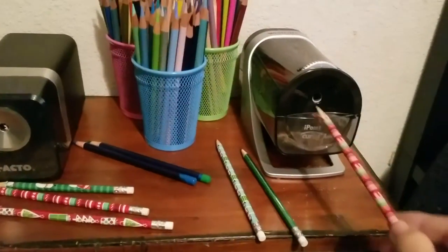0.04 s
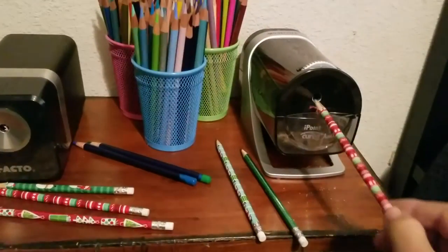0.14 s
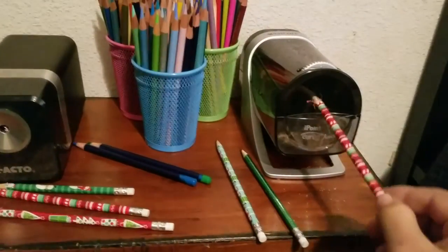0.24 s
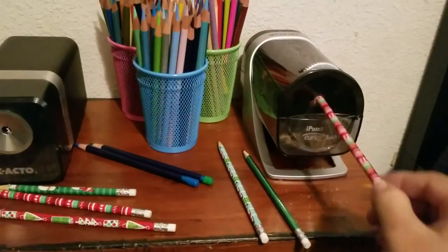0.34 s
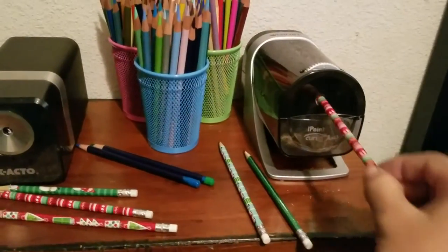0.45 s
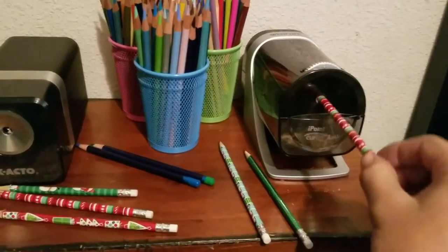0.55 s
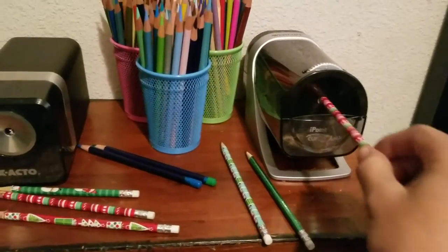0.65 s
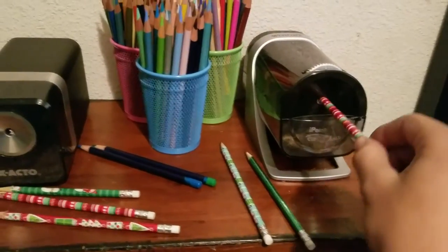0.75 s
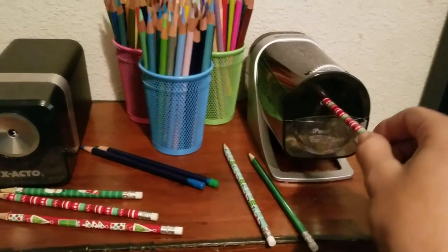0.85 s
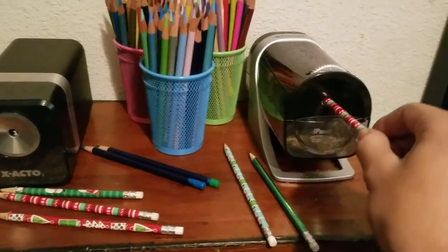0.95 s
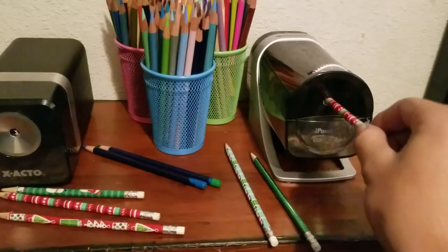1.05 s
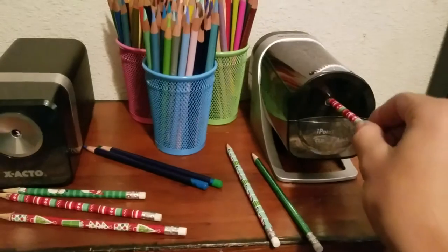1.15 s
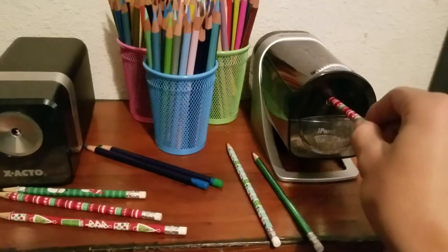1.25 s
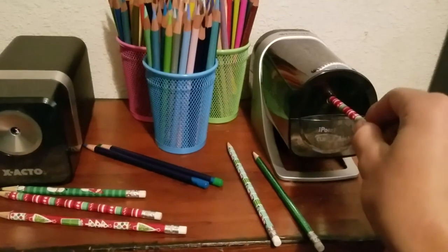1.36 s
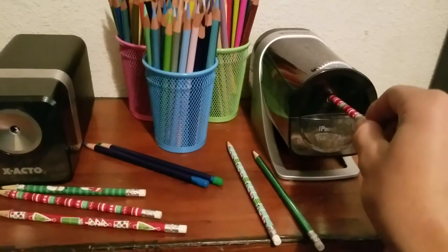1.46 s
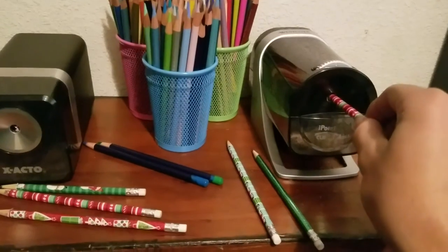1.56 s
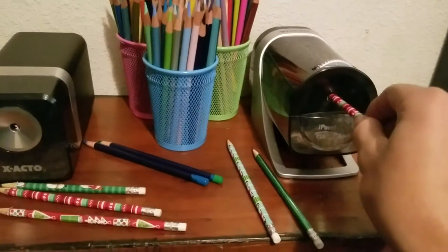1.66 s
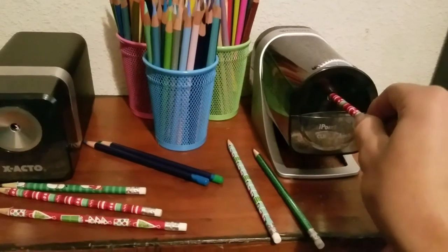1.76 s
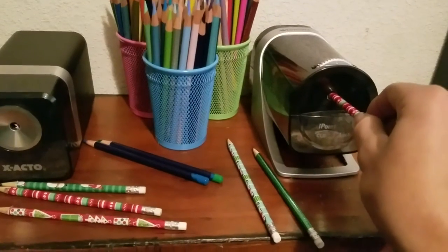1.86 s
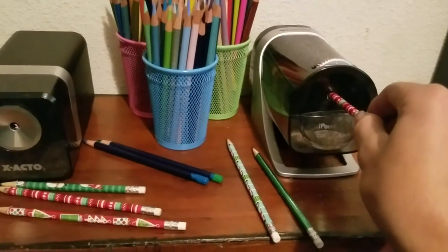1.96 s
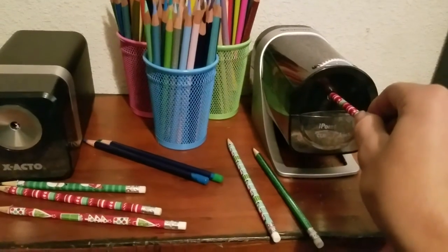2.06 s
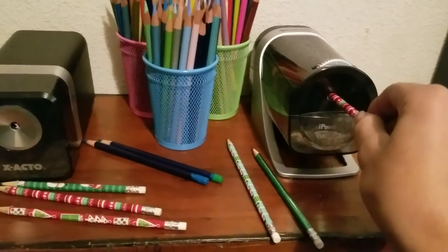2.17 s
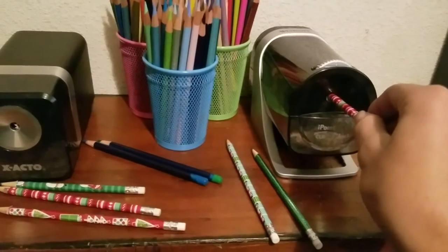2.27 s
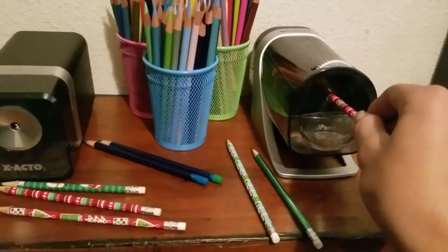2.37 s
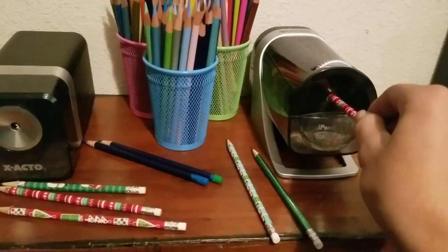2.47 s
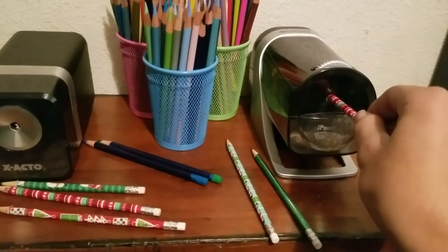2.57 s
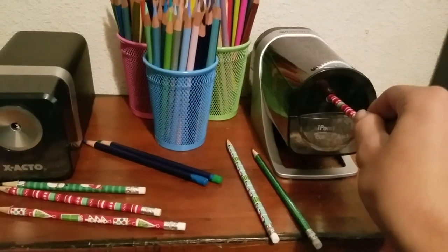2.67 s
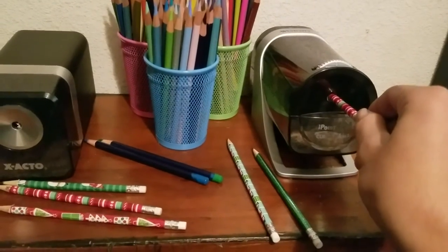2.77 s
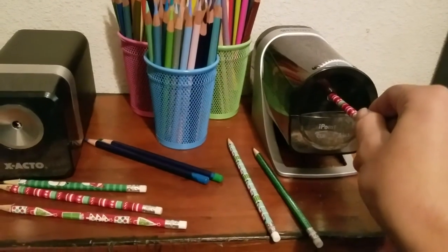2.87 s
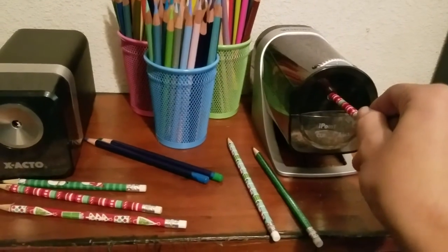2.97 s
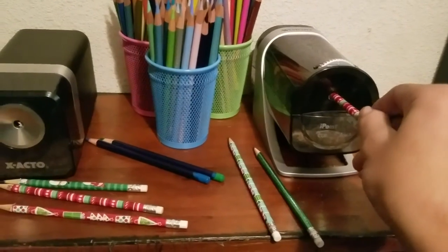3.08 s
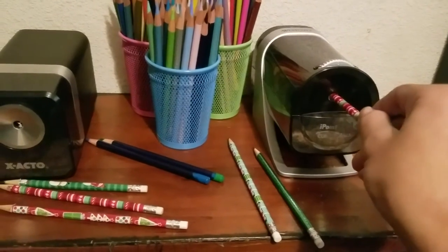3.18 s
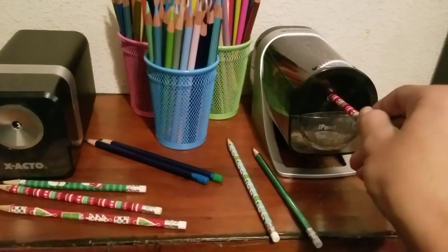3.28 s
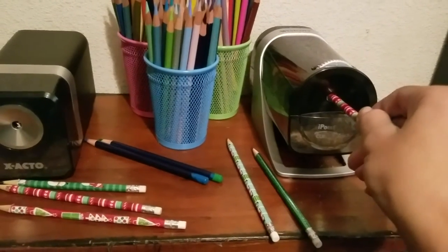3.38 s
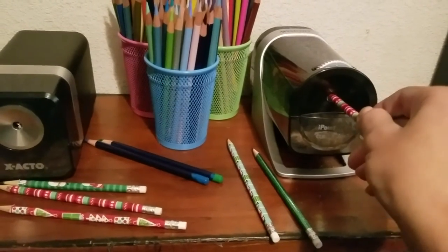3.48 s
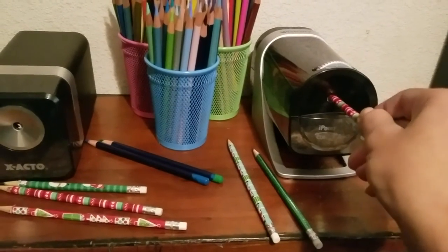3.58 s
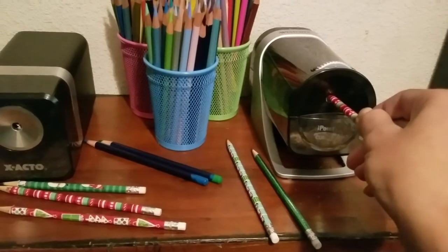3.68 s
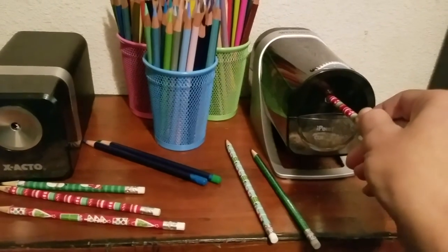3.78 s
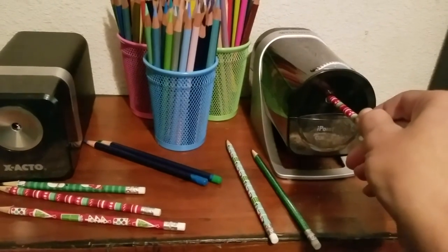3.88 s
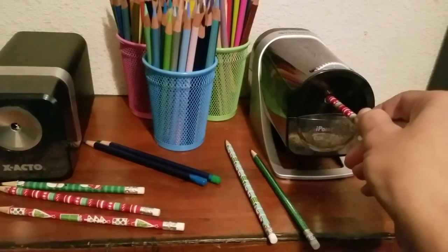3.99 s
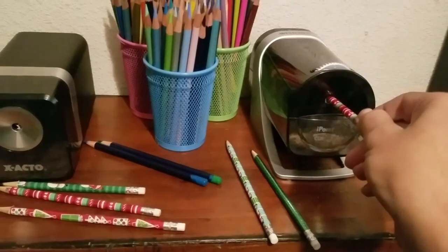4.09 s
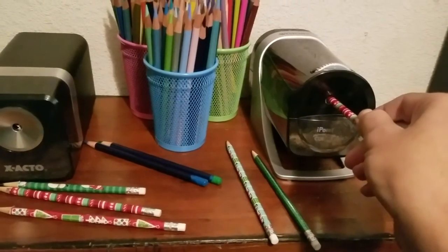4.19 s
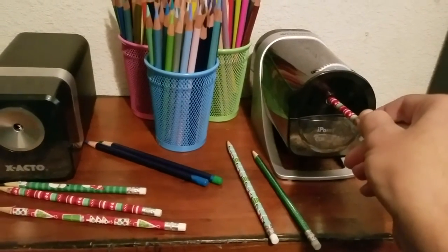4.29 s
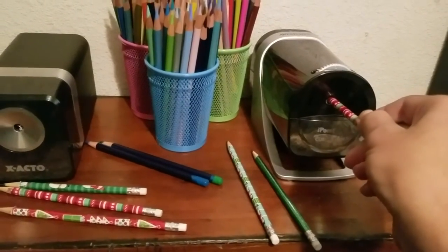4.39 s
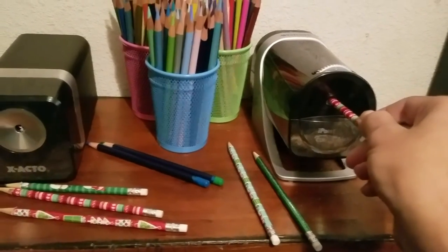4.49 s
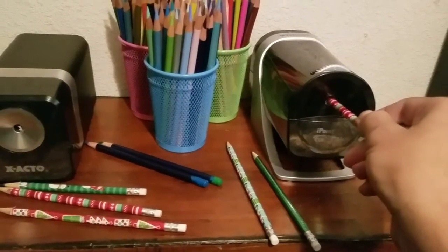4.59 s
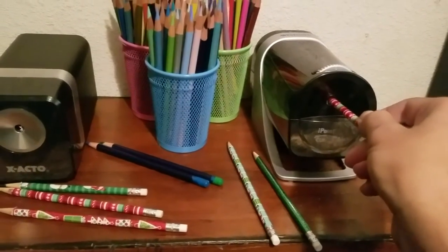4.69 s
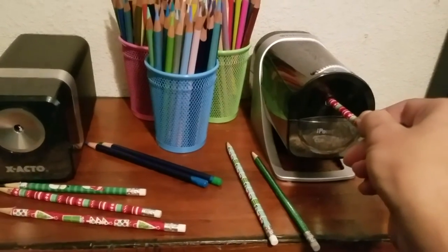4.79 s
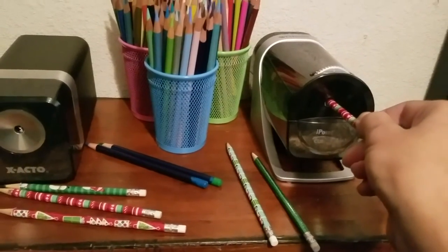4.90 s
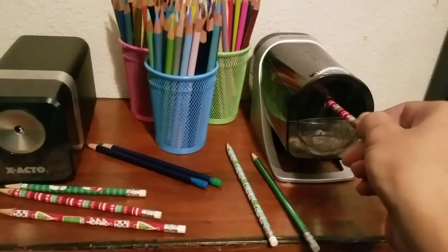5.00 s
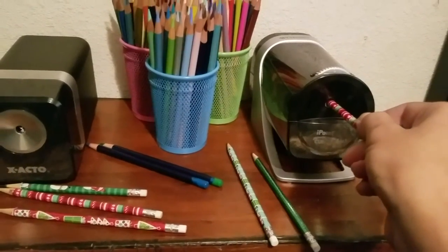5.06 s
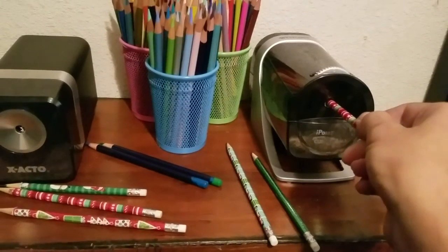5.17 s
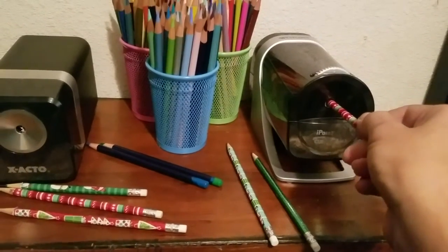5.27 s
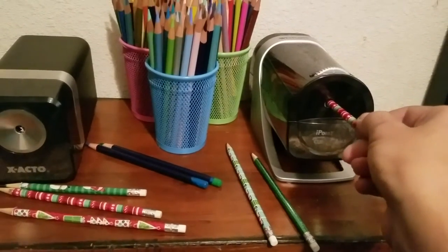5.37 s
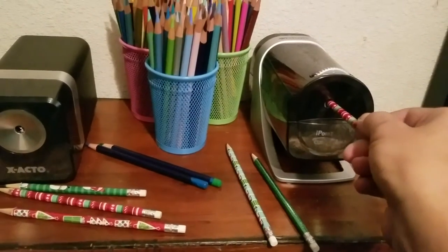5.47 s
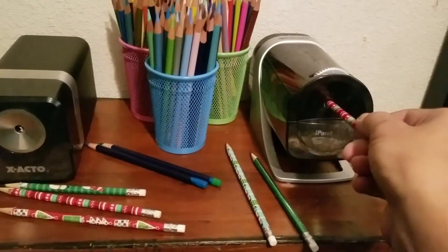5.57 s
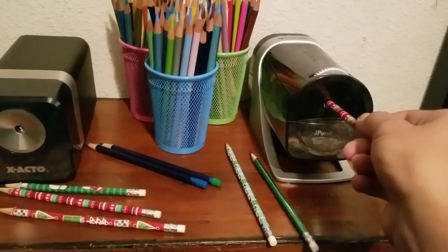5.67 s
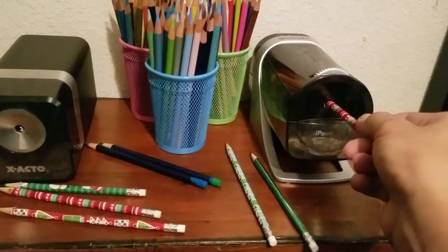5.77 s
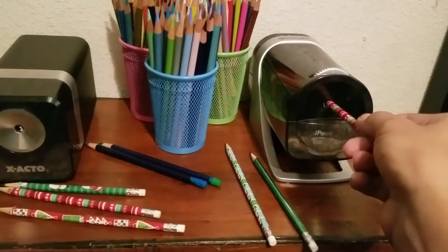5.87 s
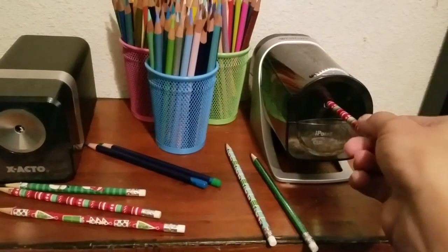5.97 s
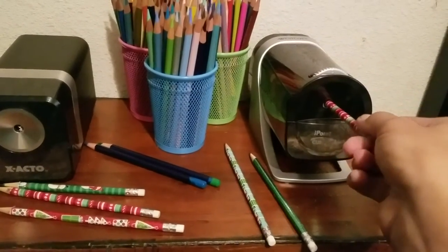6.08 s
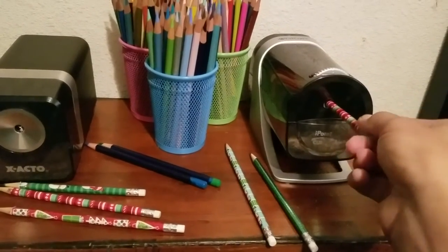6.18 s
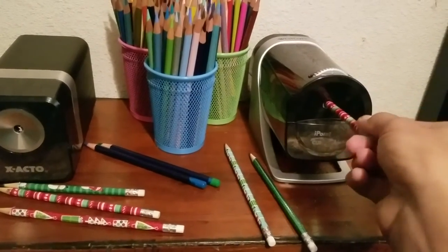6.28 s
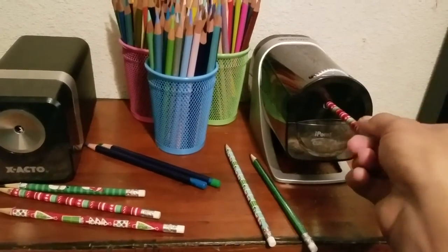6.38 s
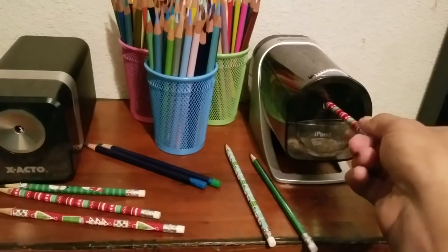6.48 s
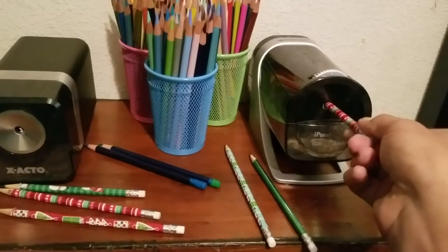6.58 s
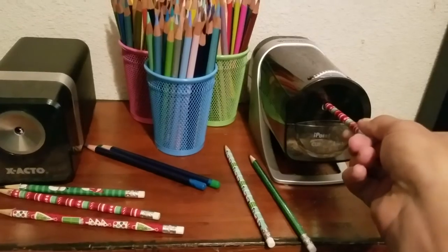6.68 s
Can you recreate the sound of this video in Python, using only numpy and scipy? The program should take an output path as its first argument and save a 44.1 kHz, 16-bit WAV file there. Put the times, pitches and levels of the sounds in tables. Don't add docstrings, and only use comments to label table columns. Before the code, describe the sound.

Close up in a small, quiet room, a pencil slides and knocks in the hollow plastic mouth of an electric sharpener. A switch clicks and the motor kicks in, whirring free for about half a second. Then wood meets the cutter: the whirr deepens into a loud, rough grind with gear whine, plastic rattle, low chatter and hissing shavings, continuing to the end.

```python
import sys
import numpy as np
from scipy import signal
from scipy.fft import rfft, irfft, next_fast_len
from scipy.io import wavfile
from scipy.ndimage import uniform_filter1d, map_coordinates

SR = 44100
rng = np.random.default_rng(int(sys.argv[2]) if len(sys.argv) > 2 else 0)


def nominal_scale(level):
    x = np.asarray(level, float) / 20
    return 10 ** x


def digitize_waveform(pressure):
    field = np.atleast_2d(pressure).T
    bounded = np.clip(field, -1, 1)
    quanta = np.round(bounded * 32767).astype(np.int16)
    wavfile.write(sys.argv[1], SR, quanta)


N = 297262
T = np.arange(N) / SR

# (frequency [Hz], level [dB per Hz])
QUIET_COLOUR = [(24, -9), (60, 4), (120, -5), (249, -3.5), (305, -8), (503, -4.5), (556, -11), (1210, -11),
                (1340, -17), (1900, -7.5), (3470, -26), (5500, -24), (9220, -30), (16000, -26)]
# (frequency [Hz], time to fall 60 dB [s])
ROOM_DECAY = [(200, 0.07), (2000, 0.75), (10000, 0.023)]
# (frequency [Hz], likeness [0-1])
ALIKENESS = [(60, 1), (100, 0.9), (180, 0.96), (310, 0.99), (550, 0.99), (950, 0.92), (1650, 0.66),
             (2860, 0.72), (4970, 1), (8640, 0.18), (15000, 0.31)]
# (frequency [Hz], level difference [dB])
LEFT_OVER_RIGHT = [(60, 0.5), (92, 0.5), (140, 0.5), (210, 1.0), (330, -1.0), (500, -3.0), (770, -0.5),
                   (1170, -0.5), (1790, 2.0), (2740, 1.5), (4190, 0.5), (6410, -0.5), (9810, 8.0),
                   (15000, 8.0)]
# (frequency [Hz], lead [radians])
LEFT_LEAD = [(0, 0), (1380, 0.2), (2410, -1.4), (2670, 0.2), (3620, -2.3), (3880, -1.7), (6200, -1.6),
             (7150, -4.0), (7410, -1.7), (11900, -8.5), (13000, -8.3), (16200, -10.7)]

# (loudest at [s], level [dB])
PENCIL_SLIDES = [
    (.15, -72),
    (.255, -61),
    (.38, -50),
    (.46, -69),
    (.655, -58),
]
# (time [s], peak [dB], ring [Hz], tick [dB])
PENCIL_KNOCKS = [
    (0.16, -53, 1210, -14),
    (0.232, -40, 1020, -20),
    (0.246, -40.5, 1060, -19),
    (0.375, -32.5, 2060, -25),
    (0.389, -43, 1260, -14),
    (0.404, -47, 1200, -14),
    (0.445, -35.5, 2760, -5),
    (0.509, -46, 1230, -13),
    (0.681, -34, 1190, 10.5),
    (0.716, -22, 980, -20),
]
# (frequency [Hz], level [dB per Hz])
MOUTH_COLOUR = [(240, -59), (400, -17), (996, 4.5), (1630, -3), (2150, 0), (2940, -21), (3620, -12),
                (4170, -24), (4820, -25), (9000, -28), (11700, -72), (19800, -120)]

# (time [s], load [0-1])
CUTTER_LOAD = [
    (0, 0.4),
    (1.2, 0.04),
    (1.27, 1),
    (6.74, 0.99),
]
# (time [s], level [dB])
HAND_PUSH = [(1.2, -1), (1.5, -6), (2, -1), (3, 0.5), (4, -0.5), (5, -0.5), (6, -0.8), (6.74, -4)]
# (time [s], lead [turns])
CUTTER_LEAD = [(.68, .21), (1.3, .22), (2, .22), (3, .21), (4, .18), (5, .13), (6, .05), (6.74, -.03)]
# (time [s], lead [cycles])
ROTOR_LEAD = [(.68, -10.7), (.84, -9.3), (1.25, -2.1), (1.32, -1.45), (1.5, -.58), (1.7, -.12), (2.1, .3),
              (2.9, .7), (3.8, 2.2), (4.3, 2.05), (4.7, 2.44), (5.9, 1.04), (6.74, .85)]

# (frequency [Hz], width [Hz], level [dB])
FREE_RESONANCES = [(1060, 31, 2.5), (1300, 30, 2), (1676, 120, 0.5), (2180, 25, 7.5), (2460, 150, -6.5),
                   (3100, 104, -8), (3950, 70, -10.5), (4630, 200, -22), (5480, 140, -23), (6230, 230, -16),
                   (7200, 110, -24), (7460, 120, -28), (7800, 120, -48), (8050, 53, -24)]
# (frequency [Hz], width [Hz], level [dB])
CUT_RESONANCES = [(801, 29, -6), (1200, 110, -4.5), (1410, 56, -16.5), (1690, 20, -9), (2260, 250, -9),
                  (2650, 46, -26)]
# (frequency [Hz], width [Hz], level [dB])
UPPER_RESONANCES = [(3800, 32, -3), (4700, 98, -5), (5530, 71, 0), (6380, 380, 5.5), (7840, 100, 2),
                    (7250, 110, 4), (8360, 110, -4)]
# (frequency [Hz], level [dB per Hz])
BODY_COLOUR = [(24, -77), (40, -70), (133, -18), (234, -23), (307, -20.5), (593, -21), (796, -10),
               (1170, -4), (1440, -7.5), (2310, -9.5), (2650, -15.5), (3890, -17.5), (4500, -25.5),
               (4950, -31.5), (5400, -27.5), (6260, -26), (9000, -37), (11700, -61), (19800, -120)]
# (frequency [Hz], level [dB])
IDLE_TONES = [(1023, -34.5), (1163, -38), (1256, -33), (1360, -34), (1464, -37), (1520, -45), (1600, -34.5),
              (1678, -33.5), (2505, -42), (2650, -49), (3200, -44), (2170, -39)]

# (time [s], rate [Hz])
MESH_RATE = [(1.2, 1290), (1.27, 1262), (1.36, 1255), (1.41, 1200), (1.6, 1160), (4, 1155), (6.74, 1146)]
# (multiple of the mesh rate, offset [Hz], level [dB], swell each turn [dB], top at [turns],
# swell each shaft turn [dB], top at [shaft turns])
GEAR_TONES = [(1, 0, -4.5, 2.2, .2, 6, .6), (1, -118, -6.5, 4.5, .97, 2, .1),
              (1, 122, -6, 4.5, .98, .6, .1), (2, 0, -8, 3, .15, 4, .4), (2, -225, -15, 5, .52, 3, .6),
              (2, -330, -17.5, 5, .4, 5, .6), (2, 140, -16, 5, .9, 3, .6), (2, 260, -22, 6, .95, 1.5, .6),
              (0, 2150, -13.5, 3, .8, 4.5, .75), (0, 1690, -16, 3, .8, 3, .6), (3, 0, -25, 3, .7, 3, .4)]
# (frequency [Hz], width [Hz], lift [dB])
GEAR_LIFTS = [(1056, 26, 4), (1158, 30, 5.5), (1296, 24, 4.5), (2300, 30, 4), (2380, 30, 4)]
# (frequency [Hz], level [dB], swell each turn [dB], top at [turns])
FLUTE_TONES = [(153, -2.5, 4.5, .78), (302, -2, 2.5, .9), (348, -10, 2.5, .25), (455, -4.5, 4, .58),
               (80, -20, 1.5, .3)]

# (frequency [Hz], level [dB per Hz])
FREE_HISS = [(5120, -30), (8700, 4), (10100, -13), (13300, -7), (13700, -17), (16000, -21)]
# (frequency [Hz], level [dB per Hz])
BLUNT_HISS = [(5120, -25), (8700, -7), (9830, -11.5), (10800, -1), (11500, 0), (12500, -6), (13900, -10),
              (15100, 3.5), (16000, -5)]
# (frequency [Hz], level [dB per Hz])
CONE_HISS = [(4710, -31), (8000, 4.5), (8650, -27), (9860, -3), (10300, -4), (10650, 6), (11100, 0.5),
             (12200, 1), (13200, 2.5), (14000, -5), (15100, 3), (16000, -3)]
# (frequency [Hz], level [dB per Hz])
SCRAPE_COLOUR = [(5000, -18), (9000, -10), (10100, -10), (10700, 3), (11600, -3), (13800, -8), (15000, 7),
                 (16000, 1)]
# (time [s], level over the hiss [dB])
POINT_SCRAPES = [(1.27, 0), (1.41, -12), (1.83, -1), (4.06, -2), (4.22, -3), (4.38, -5), (4.58, -7),
                 (4.75, -1), (4.93, 1), (5.08, 0), (5.24, 3), (5.39, -7), (5.6, 4), (5.76, 4), (5.93, 2),
                 (6.09, 3), (6.24, 1), (6.39, 3), (6.53, 1), (6.6, 3), (6.69, -3)]

TURN_HZ, MAINS_HZ = 6, 120
SHAFT = 5
START_S = 0.68


def unit(x):
    return x / np.sqrt(np.mean(x ** 2) + 1e-20)


def along(points, hz):
    f, v = np.transpose(points)
    return np.interp(np.log(hz + 1), np.log(f + 1), v)


def over_time(points):
    return np.interp(T, *np.transpose(points))


def ramp(t0, t1):
    return np.clip((T - t0) / (t1 - t0), 0, 1)


def wobble(rate, size=N):
    coarse = T[:size + 64:64]
    knots = rng.standard_normal(int(N * rate / SR) + 4)
    return np.interp(T[:size], coarse, map_coordinates(knots, [coarse * rate]))


def bumps(events, length_s):
    coarse = T[::64]
    bells = sum(nominal_scale(db) * np.exp(-((coarse - s) / length_s) ** 2) for s, db in events)
    return np.interp(T, coarse, bells)


def swell(turns, db, top):
    return nominal_scale(db * np.cos(2 * np.pi * (turns - top)))


def tone_phase(hz):
    return 2 * np.pi * np.cumsum(hz) / SR


def grit(spread_db):
    return unit(rng.standard_normal(N) * nominal_scale(spread_db * np.minimum(rng.standard_exponential(N), 5.5)))


def filtered(x, response):
    m = next_fast_len(N + SR // 8)
    return irfft(rfft(x, m) * response(np.fft.rfftfreq(m, 1 / SR)), m)[..., :N]


def coloured(x, points):
    return filtered(x, lambda f: nominal_scale(along(points, f)))


def modes(peaks):
    def response(f):
        total = 0
        for k, (c, width, db) in enumerate(peaks):
            total = total + (-1) ** k * nominal_scale(db) * 1j * f * width / (c * c - f * f + 1j * f * width)
        return total
    return response


def quiet_room():
    a, b = coloured(rng.standard_normal((2, N)), QUIET_COLOUR)
    return nominal_scale(-64.5) * unit(np.array([a + 0.55 * b, a - 0.6 * b]))


def pencil():
    ticks, puffs = np.zeros(N + SR), np.zeros(N + SR)
    t = np.arange(SR // 5) / SR
    for s, db, hz, tick_db in PENCIL_KNOCKS:
        tick_hz = 4180 if s < START_S else 6000
        tick, puff = rng.standard_normal((2, len(t)))
        ring = nominal_scale(-0.5 - 60 * t / 0.023) * np.sin(2 * np.pi * hz * t)
        click = np.diff(tick, prepend=0) + 2.9 * np.sin(2 * np.pi * tick_hz * t)
        click = nominal_scale(tick_db - 13 - 60 * t / 0.012) * click
        start = round(s * SR)
        ticks[start:][:len(t)] += nominal_scale(db) * (ring + click)
        puffs[start:][:len(t)] += nominal_scale(db - 2 - 60 * t / 0.06) * puff
    rise, fall = 480, 210
    slide = sum(nominal_scale(db - np.where(T < s, rise, fall) * abs(T - s)) for s, db in PENCIL_SLIDES)
    puffs = puffs[:N] + slide * nominal_scale(11.0) * (T < 0.69) * grit(spread_db=4)
    ticks = signal.sosfilt(signal.butter(2, 500, 'high', fs=SR, output='sos'), ticks[:N])
    return ticks + coloured(puffs, MOUTH_COLOUR)


def hand():
    rumble = unit(filtered(rng.standard_normal(N), modes([(141, 30, 0)])))
    return nominal_scale(-69) * np.exp(-((T - 0.44) / 0.14) ** 2) * rumble


def hum(load, push_db):
    free_db, cut_db = -43.6, -50
    lead = uniform_filter1d(over_time(ROTOR_LEAD), size=2000)
    rotor_db = free_db + (cut_db - free_db) * load - 3 * (1 - ramp(START_S, 0.73)) + 1.5 * wobble(9)
    rotor = nominal_scale(rotor_db) * np.cos(2 * np.pi * (115.5 * T + lead))
    mains_db = -47.6 + 0.33 * push_db - 3.5 * (1 - load)
    mains = nominal_scale(mains_db) * np.cos(2 * np.pi * (119.925 * T - 0.11))
    return ramp(START_S, START_S + 0.02) * (rotor + mains)


def idle():
    n = int(1.3 * SR)
    tones = 0
    for hz, db in IDLE_TONES:
        gain = nominal_scale(db + 2.5 * wobble(20, size=n))
        tones = tones + gain * np.sin(tone_phase(hz + 6 * wobble(40, size=n)))
    return np.pad(unit(tones), (0, N - n))


def free_rattle(teeth):
    rattle = unit(filtered(grit(spread_db=2.5) * teeth, modes(FREE_RESONANCES)))
    return nominal_scale(-3.0) * rattle + nominal_scale(-5.5) * idle()


def body_rattle(teeth, load, turn):
    jolt_db = 2 * np.exp(-((turn % 1 - 0.713) / 0.078) ** 2)
    broad = unit(coloured(grit(spread_db=2.5) * teeth, BODY_COLOUR))
    broad = nominal_scale(load * jolt_db - 4.5) * swell(turn, 0.5 * load, 0.97) * broad
    low = filtered(broad, lambda f: 1 / (1 + (f / 650) ** 4))
    low_db = -6 * (1 - load) + load * (1.16 * wobble(13) - 1.5)
    return broad + low * (nominal_scale(low_db) * swell(turn, 2.6 * load, 0.52) - 1)


def cutting_rattle(teeth, turn):
    ring = unit(filtered(grit(spread_db=1.0) * teeth, modes(CUT_RESONANCES)))
    upper = unit(filtered(grit(spread_db=4) * teeth, modes(UPPER_RESONANCES)))
    return nominal_scale(-10) * swell(turn, 4.26, 0.72) * ring + nominal_scale(-26) * swell(turn, 2.5, 0.9) * upper


def whine(turn):
    bite_hz = 33 * np.cos(2 * np.pi * (turn - 0.04)) + 5 * wobble(12)
    mesh_hz = over_time(MESH_RATE) + bite_hz * ramp(1.35, 1.35 + 0.1534)
    out = 0
    for multiple, offset_hz, db, turn_db, top, shaft_db, shaft_top in GEAR_TONES:
        hz = multiple * mesh_hz + offset_hz + (4 if multiple else 11) * wobble(60)
        lift_db = -4
        for c, width, top_db in GEAR_LIFTS:
            if abs(c - hz.mean()) < 200:
                lift_db = lift_db + top_db * np.exp(-((hz - c) / width) ** 2)
        gain = swell(turn, turn_db, top) * swell(SHAFT * turn, shaft_db, shaft_top)
        if multiple == 1 and offset_hz > 0:
            gain = gain * swell(turn / 2, 3, 0.52)
        level_db = db + lift_db + 1.1 * wobble(5) + 2 * wobble(45)
        out = out + nominal_scale(level_db) * gain * np.sin(tone_phase(hz))
    return out


def chatter(turn):
    out = 0
    for hz, db, turn_db, top in FLUTE_TONES:
        phase = tone_phase(hz * (1 + 0.025 * wobble(30)))
        gain = swell(turn, turn_db, top) * swell(2 * turn, 2.8, 2 * top)
        out = out + nominal_scale(db + 1.5 * wobble(9) + 2.2 * wobble(30)) * gain * np.sin(phase)
    return out


def shaving(load, turn):
    worn, cone = ramp(3.8, 5.5), ramp(2.5, 2.9)
    bite_db = 2 * (1 - 0.5 * worn) * np.cos(4 * np.pi * (turn - 0.1))
    fibres = grit(spread_db=4.0) * nominal_scale(0.65 * wobble(30) + 0.49 * wobble(150))
    colours = (FREE_HISS, BLUNT_HISS, CONE_HISS, SCRAPE_COLOUR)
    free, blunt, even, bright = [unit(coloured(fibres, c)) for c in colours]
    bites = nominal_scale(bite_db - 3 * worn) * ((1 - cone) * blunt + cone * even)
    scrapes = bumps(POINT_SCRAPES, length_s=0.019) * bright
    return nominal_scale(-69) * free + nominal_scale(-41.5) * load * (bites + scrapes)


def machine():
    push_db = over_time(HAND_PUSH)
    load = np.clip(over_time(CUTTER_LOAD), 0, 1)
    turn = TURN_HZ * T + over_time(CUTTER_LEAD)
    teeth = swell(SHAFT * turn, 0.12, 0.49) * swell(MAINS_HZ * T, 0.64, 0.094) * nominal_scale(0.81 * wobble(60))
    free = free_rattle(teeth)
    cutting = cutting_rattle(teeth, turn) + whine(turn)
    broad = body_rattle(teeth, load, turn)

    free_db, cut_db = -19.5, -18
    first_bite_db = 0.56 * np.exp(-((T - 1.52) / 0.44) ** 2)
    spin_up_db = -11 * (1 - ramp(START_S, START_S + 0.05))
    case_db = free_db + (cut_db - free_db) * load + first_bite_db + 0.033 * push_db + spin_up_db
    case = (1 - load) * free + load * cutting + (0.68 + 0.24 * load) * broad
    case = swell(turn / 2, 0.26 * load, 0.57) * nominal_scale(case_db) * case

    free_db, cut_db = -58, -43.5
    flutes = nominal_scale(free_db + (cut_db - free_db + push_db) * load) * chatter(turn)
    return (T > START_S) * (case + flutes + hum(load, push_db) + shaving(load, turn))


def placed(x):
    z = signal.stft(x, nperseg=256)[2]
    drift = np.cumsum(1.2 * rng.standard_normal(z.shape), axis=1)
    scattered = signal.istft(z * np.exp(1j * drift), nperseg=256)[1][:N]
    scattered = unit(scattered) * np.std(x)

    def spread(f):
        angle = np.arccos(np.clip(along(ALIKENESS, f), 0, 1)) / 2
        return np.array([np.cos(angle), np.sin(angle)])

    def sides(f):
        half = nominal_scale(along(LEFT_OVER_RIGHT, f) / 2) * np.exp(0.5j * along(LEFT_LEAD, f))
        return np.array([half, 1 / half])

    mid, side = filtered(np.array([x, scattered]), spread)
    return filtered(np.array([mid + side, mid - side]), sides)


def tail(seconds):
    noise = rng.standard_normal((2, int(seconds * SR)))
    hz, t, z = signal.stft(noise, SR, nperseg=256)
    h = signal.istft(z * nominal_scale(-60 * t / along(ROOM_DECAY, hz)[:, None]), SR, nperseg=256)[1]
    return h / np.linalg.norm(h[0])


def scene():
    quiet = quiet_room()
    near = placed(pencil() + hand() + machine())
    delayed = np.pad(near, ((0, 0), (300, 0)))
    room = signal.fftconvolve(delayed, tail(0.4), axes=1)[:, :N]
    return near + nominal_scale(-19) * room + quiet


def band_limit(x):
    return signal.sosfilt(signal.butter(12, 16620, fs=SR, output="sos"), x)


def record(dry):
    limited = filtered(dry, lambda f: f < 15760)
    return band_limit(limited)


dry = scene()
out = record(dry)
digitize_waveform(out)
```